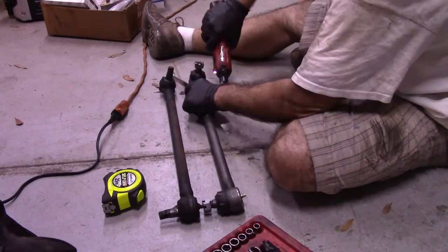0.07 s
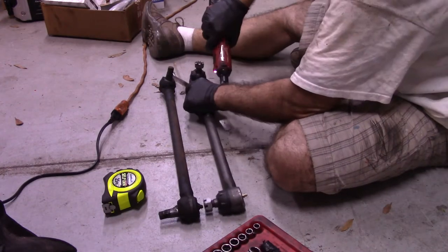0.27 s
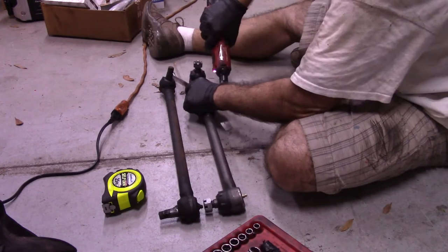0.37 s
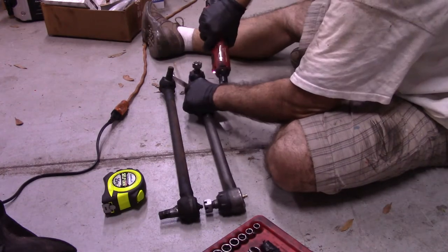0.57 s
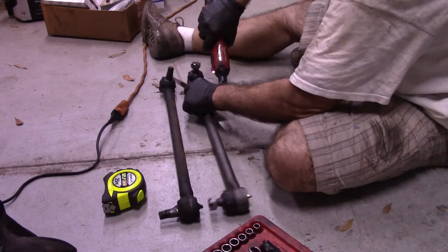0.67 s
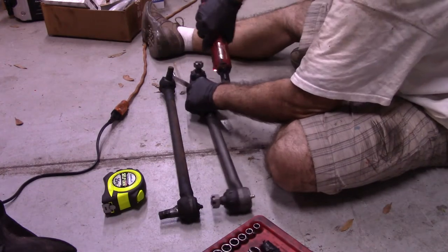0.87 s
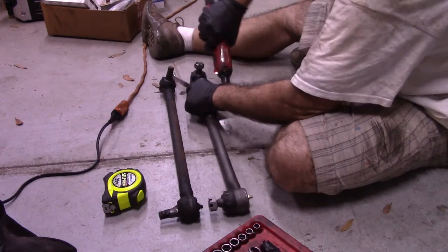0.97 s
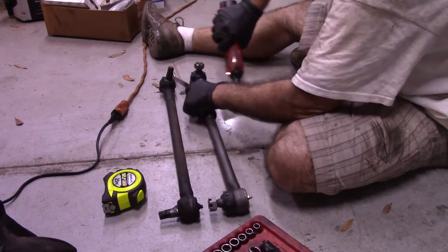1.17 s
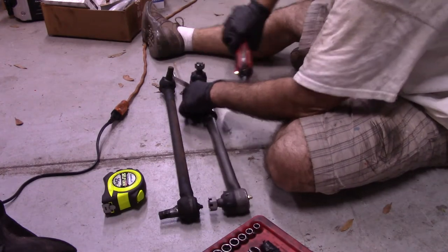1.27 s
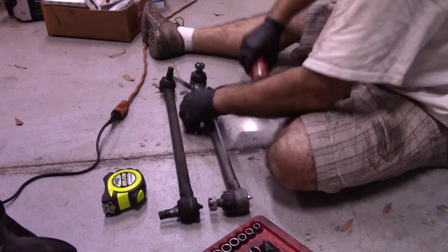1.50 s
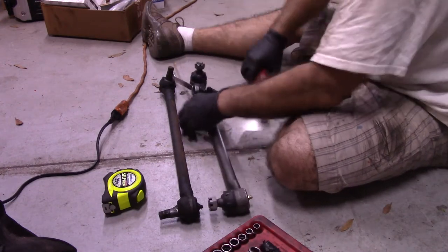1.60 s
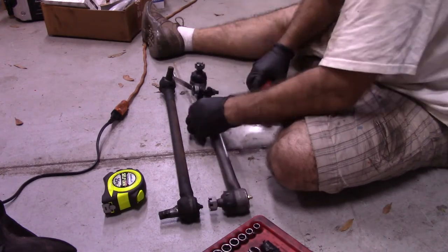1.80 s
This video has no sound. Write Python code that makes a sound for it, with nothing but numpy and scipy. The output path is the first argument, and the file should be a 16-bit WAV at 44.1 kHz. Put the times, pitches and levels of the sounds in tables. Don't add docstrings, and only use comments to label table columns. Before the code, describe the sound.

A cordless ratchet clicks on, rattles hard for one burst, then coasts down in slowing ticks

```python
import sys
import numpy as np
from scipy import signal
from scipy.fft import rfft, irfft, next_fast_len
from scipy.io import wavfile
from scipy.ndimage import map_coordinates

SR = 44100
rng = np.random.default_rng(int(sys.argv[2]) if len(sys.argv) > 2 else 0)


def boost(x):
    u = np.asarray(x, float) / 20
    return 10 ** u


def bounce(signal):
    frames = np.transpose(np.atleast_2d(signal))
    limited = np.clip(frames, -1, 1)
    pcm = np.round(limited * 32767).astype(np.int16)
    wavfile.write(sys.argv[1], SR, pcm)


N = 81585

# (frequency [Hz], density [dB/Hz])
AIR_SPECTRUM = [(25, -20), (60, -11), (190, -7), (480, -11), (940, -13), (1500, -24), (4000, -32),
                (9000, -41.5), (15500, -64)]
# (frequency [Hz], width [Hz], level [dB])
FAN_LINES = [(152, 8, -52), (910, 6, -55.5), (356, 20, -66)]

# (time [s], level [dB], brightness [dB])
KNOCKS = [(.045, -55, 2), (0.134, -43.5, -14.5), (.199, -37.5, 11), (0.203, -36, -6), (0.216, -30.5, 7),
          (0.242, -19, -9), (0.263, -25, 1), (0.814, -10, -3), (0.864, -14.5, -4), (0.909, -39, 1),
          (0.92, -22, -18), (0.924, -10.5, -3.5), (0.95, -41, 19), (1.702, -31.5, -4.5), (1.744, -44, 2),
          (1.315, -30.5, 8), (0.205, -33, 4), (0.788, -15.5, -15), (0.724, -16.5, -20.5)]
# (frequency [Hz], density [dB])
KNOCK_BODY = [(200, -9), (600, 3.5), (1600, -4), (3500, -12.5), (6000, -28.5)]
# (frequency [Hz], density [dB])
KNOCK_EDGE = [(2500, -7.5), (4000, -2), (5500, -9.5), (8000, -6.5), (11000, -20), (16000, -40)]
# (frequency [Hz], width [Hz], gain [dB])
HOUSING = [(880, 130, 1.5), (1524, 280, 5), (2975, 780, 5), (3810, 1040, 6), (6270, 1370, 6),
           (9740, 2900, 4.5)]
# (time [s], frequency [Hz], level [dB], T60 [s])
PINGS = [
    (.179, 5600, -50, .3),
    (1.315, 7090, -22.5, .33),
    (.281, 1570, -25, .6),
    (1.763, 7950, -66, .15),
    (1.312, 3000, -38, .1),
    (.2445, 500, -14, .018),
    (.2445, 800, -17, .018),
    (1.601, 3300, -45, .15),
    (.181, 3730, -58, .2),
    (1.702, 720, -40, .04),
]
PING_STOP_S = [.016, .05, .06, .05, .02, .02, .02, .05, .016, .02]

# (time [s], level [dB])
RUSH_DB = [(.238, -110), (.25, -31.5), (.3, -23.5), (.7, -20.5), (.8, -27.5), (.85, -21.5), (.95, -20.5),
           (1.05, -26.5), (1.15, -32), (1.3, -39.5), (1.45, -44.5), (1.62, -54), (1.78, -66.5)]
# (frequency [Hz], density [dB/Hz])
RUSH_SPECTRUM = [(71, -59.5), (120, -56), (144, -10), (188, -14.5), (839, 1.5), (1210, -7), (1620, -2),
                 (12500, -7.5), (16000, -14.5)]
# (time [s], level [dB])
RUB_DB = [(.24, -100), (.25, -50), (1.3, -52), (1.55, -68), (1.7, -63), (1.76, -88)]
# (frequency [Hz], density [dB])
PAWL_SPECTRUM = [(3000, -65), (6000, -5), (9000, -9.5), (10500, -7.5), (11600, -4), (12800, 5.5),
                 (14200, -9), (16000, -35.5)]
# (time [s], frequency [Hz], level [dB])
WHINE = [(.95, 3500, -46), (1.04, 3100, -35), (1.15, 2400, -42), (1.21, 2050, -44), (1.28, 1700, -46),
         (1.36, 1420, -50), (1.45, 1100, -65)]
# (multiple of mesh frequency [1], level [dB])
WHINE_ORDERS = [(1, 0), (.25, -3), (.58, -5)]

# (time [s], level [dB])
JUDDER_DB = [(.24, -32), (.33, -49), (.45, -44.5), (.55, -34.5), (.7, -35.5), (.81, -28), (.84, -37.5),
             (.98, -38), (1.14, -78)]
# (frequency [Hz], density [dB])
JUDDER_SPECTRUM = [(80, -46), (140, -5.5), (300, -3.5), (700, -2), (1500, -52)]

# (time [s], peak [dB], ring [Hz], grind re peak [dB])
BLOWS = [(0.2463, -20, 2750, -19), (0.2617, -5, 4160, -9.5), (0.2794, -10, 2700, -7),
         (0.2986, -11, 3600, -2), (0.3138, -5, 3100, -7), (0.3301, -8, 3900, -5), (0.3452, -9, 3160, -8),
         (0.36, -10, 3650, -9), (0.3758, -5, 3550, -11), (0.3914, -7, 3060, -9), (0.4079, -6, 2750, -12),
         (0.4225, -3, 3040, -16), (0.4386, -5.5, 3320, -17), (0.4534, -6.5, 3450, -15),
         (0.4684, -7, 3930, -19), (0.4846, -6.5, 3660, -7.5), (0.4999, -4.5, 3200, -10),
         (0.5165, -6, 3340, -8.5), (0.5336, -6, 2780, -7.5), (0.55, -2, 3070, -11), (0.5657, -8, 2540, -9),
         (0.5715, -7, 3950, -14), (0.5847, -8, 2720, -8), (0.6014, -4, 2870, -7.5),
         (0.6212, -7, 3440, -8.5), (0.6263, -7.5, 3070, -8.5), (0.643, -6.5, 3800, -1),
         (0.6661, -4, 2960, -14), (0.6868, -2.5, 3890, -9), (0.7002, -8, 2980, -4.5),
         (0.7213, -5.5, 3880, -4.5), (0.7412, -5.5, 3070, -3.5), (0.7486, -7.5, 2520, -9.5),
         (0.7655, -5.5, 4650, -8), (0.769, -7, 2880, -6.5), (0.788, -9, 3740, -11),
         (0.795, -4.5, 3840, -10), (0.813, -5, 3980, -4.5), (0.8268, -9, 3600, -2), (0.8641, -8, 3750, -13),
         (0.8834, -12, 3510, -4), (0.9092, -6.5, 3860, -11), (0.9508, -15, 4080, -9),
         (0.968, -8, 3530, -18), (0.9814, -21, 3300, -17), (1.0125, -16.5, 3580, -13),
         (1.0282, -19, 3100, -25), (1.0471, -17, 2940, -31), (1.082, -14, 3560, -16),
         (1.1148, -17.5, 3700, -15)]
# (frequency [Hz], density [dB/Hz])
GRIND_SPECTRUM = [(71, -59), (120, -8), (181, -21), (643, -3.5), (2200, -5), (2990, -9.5), (5190, -13),
                  (13000, -23), (16000, -49)]
# (frequency [Hz], width [Hz], level [dB])
YOKE_MODES = [(1400, 400, 0.5), (2980, 810, 1.5), (3740, 1700, -0.5), (6300, 2200, -7), (9220, 1240, 8.5)]
# (frequency [Hz], density [dB])
CRACK_SPECTRUM = [(2000, -30), (4000, -34), (7000, 23), (9500, 18.5), (12000, 8), (15000, -4)]

# (time [s], position [turns])
CRANK_TURNS = [(.2555, 0), (.2755, 1), (.293, 2), (.325, 4), (.464, 13), (.528, 17), (.597, 21), (.655, 24),
               (.738, 28), (.806, 31), (.844, 33), (.875, 35), (.977, 42), (1.024, 45), (1.077, 48),
               (1.136, 51)]
# (time [s], peak [dB], dull part [dB])
COAST_TICKS = [(1.0472, -8.5, -32), (1.1568, -18, -24), (1.1592, -15, -28), (1.1804, -16, -21),
               (1.185, -14.5, -26), (1.204, -21, -20), (1.209, -16, -18), (1.2317, -17, -13),
               (1.2373, -19, -5), (1.261, -21, -5), (1.265, -15, -2.5), (1.293, -14, -13), (1.297, -19, -9),
               (1.3271, -13, -11), (1.334, -17.5, -3), (1.367, -13.5, -10), (1.375, -20, -10),
               (1.4143, -11, -14), (1.4228, -16.5, -16), (1.4731, -14, -11), (1.4859, -17, -4.5),
               (1.57, -19, -2), (1.6007, -19, -1), (1.701, -42, 12)]
# (frequency [Hz], width [Hz], level [dB])
TOOTH_MODES = [(7000, 2300, 0.5), (10500, 620, -2.5), (12570, 340, -1.5), (13130, 520, 0),
               (15400, 1500, -10)]
# (frequency [Hz], density [dB])
DULL_SPECTRUM = [(300, 6), (900, 9), (2200, -5), (3500, 10.5), (5000, -7), (8000, -5)]

# (frequency [Hz], T60 [s])
WALL_T60_S = [(200, 0.088), (2000, 0.45), (8000, 0.19), (14000, 0.22)]
# (frequency [Hz], gain [dB])
SIDE_DB = [(30, -36), (250, -16), (600, -21), (1200, -23), (2500, -16.5), (4500, -10.5), (12000, -9)]


def unit(x):
    return x / np.sqrt(np.mean(x ** 2) + 1e-20)


def along(points, hz):
    f, v = np.transpose(points)
    return np.interp(np.log(hz + 1), np.log(f + 1), v)


def curves(rows):
    s, *cols = np.transpose(rows)
    return [np.interp(np.arange(N) / SR, s, c) for c in cols]


def filtered(x, response):
    m = next_fast_len(N + SR // 2)
    return irfft(rfft(x, m) * response(np.fft.rfftfreq(m, 1 / SR)), m)[..., :N]


def noise(spectrum, peaks=()):
    def response(f):
        bumps_db = sum(db / (1 + ((f - c) / (w / 2)) ** 2) for c, w, db in peaks)
        return boost(along(spectrum, f) + bumps_db)
    return unit(filtered(rng.standard_normal(N), response))


def wander(knots):
    return map_coordinates(rng.standard_normal(knots), [np.linspace(0, knots - 1, N)])


def decay(t, t60_s, rise_s):
    return boost(-60 * t / t60_s) * (1 - np.exp(-t / rise_s))


def bursts(times, dbs, t60_s, rise_s=0.00019):
    spikes, t = np.zeros(N), np.arange(SR // 8) / SR
    np.add.at(spikes, np.round(np.asarray(times) * SR).astype(int), boost(dbs))
    return signal.fftconvolve(spikes, decay(t, t60_s, rise_s))[:N]


def struck(times, dbs, modes):
    spikes, luck = np.zeros(N), rng.standard_normal((len(times), 6))
    for j in range(3):
        at = (times + 0.0003 * j * np.abs(luck[:, j])) * SR
        np.add.at(spikes, at.astype(int), boost(dbs - 6 * j) * np.sign(luck[:, 3 + j]))

    def response(f):
        total = 0
        for k, (c, w, db) in enumerate(modes):
            gain = (-1) ** k * boost(db) * SR / (2 * np.pi)
            total = total + gain * 1j * f / (c * c - f * f + 1j * f * w)
        return total
    return filtered(spikes, response)


def air():
    t, hum = np.arange(N) / SR, np.zeros(N)
    for hz, width_hz, db in FAN_LINES:
        resonance = lambda f: 1 / (1 + ((f - hz) / width_hz) ** 2)
        waver = unit(filtered(rng.standard_normal(N), resonance))
        hum += boost(db) * (np.sin(2 * np.pi * hz * t) + 0.29 * waver)
    return boost(-48) * noise(AIR_SPECTRUM) + hum


def knocks():
    t60_s = 0.034
    s, db, bright_db = np.transpose(KNOCKS)
    body = bursts(s, db - bright_db / 2, t60_s, 0.0029) * noise(KNOCK_BODY, HOUSING)
    edge = bursts(s, db + bright_db / 2 + 4.5, t60_s / 3) * noise(KNOCK_EDGE)
    return body + edge


def pings():
    rise_s, damped_db, damping_s = 0.003, -8, 0.0027
    out = np.zeros(N)
    for (s, hz, db, t60_s), stop_s in zip(PINGS, PING_STOP_S):
        t = np.clip(np.arange(N) / SR - s, 0, None)
        damp_db = damped_db * np.clip((t - stop_s) / damping_s, 0, 1)
        out += boost(db + damp_db) * decay(t, t60_s, rise_s) * np.sin(2 * np.pi * hz * t)
    return out


def gears():
    grit_db = 3.43 * np.tanh(wander(700))
    rush = boost(curves(RUSH_DB)[0] + grit_db) * noise(RUSH_SPECTRUM, HOUSING)
    rub = boost(curves(RUB_DB)[0] + grit_db) * noise(PAWL_SPECTRUM, [(13100, 320, 14)])

    mesh_hz, db = curves(WHINE)
    phase = 2 * np.pi * np.cumsum(mesh_hz) / SR
    lines = sum(boost(d) * np.sin(m * phase) for m, d in WHINE_ORDERS)
    i = np.arange(N)
    sounding = (i > WHINE[0][0] * SR) * (i < WHINE[-1][0] * SR)
    whine = sounding * boost(db + 1.4 * wander(120)) * lines
    return rush + rub + whine


def bolt_judder():
    loaded = np.abs(np.arange(N) / SR - 0.69) < 0.45
    return boost(curves(JUDDER_DB)[0]) * loaded * noise(JUDDER_SPECTRUM)


def yoke_blows():
    ring_t60_s, ring_db, ring_rise_s = 0.009, -2, 0.00047
    times, db, hz, grind_db = np.transpose(BLOWS)
    times = times + 0.0008
    ring, t = np.zeros(N), np.arange(SR // 40) / SR
    for at, level_db, f in zip(times, db, hz):
        tone = boost(level_db + ring_db) * decay(t, ring_t60_s, ring_rise_s) * np.sin(2 * np.pi * f * t)
        ring[round(at * SR):][:len(t)] += tone
    grind = bursts(times, db + grind_db, 0.04, 0.002) * noise(GRIND_SPECTRUM, HOUSING)
    crack = bursts(times, db - 8, 0.006, 0.00014) * noise(CRACK_SPECTRUM)
    return ring + grind + struck(times, db - 10.5, YOKE_MODES) + crack


def pawl_ticks():
    scatter_s, scatter_db = 0.0007, 2.5
    s, turns = np.transpose(CRANK_TURNS)
    k, luck = np.arange(52), rng.standard_normal((52, 2))
    times = np.interp(k - 0.06, turns, s) + scatter_s * luck[:, 0]
    db = -10.5 - 3 * ((k > 17) & (k < 29)) + scatter_db * luck[:, 1]
    return bursts(times, db, 0.0077, 0.0011) * noise(PAWL_SPECTRUM, [(12700, 4100, 7.1)])


def coasting():
    s, db, dull_db = np.transpose(COAST_TICKS)
    tooth = struck(s, db - 4.5, TOOTH_MODES)
    hiss = bursts(s, db - 8, 0.015) * noise(PAWL_SPECTRUM)
    dull = bursts(s, db + dull_db - 15, 0.044) * noise(DULL_SPECTRUM)
    return tooth + hiss + dull


def garage(x):
    hz, t, z = signal.stft(rng.standard_normal(SR // 2), SR, nperseg=256)
    fade = boost(-60 * t / along(WALL_T60_S, hz)[:, None])
    tail = signal.istft(z * fade, SR, nperseg=256)[1]
    delayed = np.pad(x, (200, 0))
    return signal.fftconvolve(delayed, tail / np.linalg.norm(tail))[:N]


def scene():
    low_cut = lambda f: 1 / (1 + (130 / (f + 1)) ** 4)
    tool = knocks() + pings() + gears() + bolt_judder() + yoke_blows() + pawl_ticks() + coasting()
    tool = filtered(tool, low_cut)
    mid = tool + boost(-11) * garage(tool) + air()
    side = 0.23 * np.roll(tool, 40) + 0.084 * garage(tool) + air()
    side = filtered(side, lambda f: boost(along(SIDE_DB, f)))
    return np.array([mid + side, mid - side])


def band_limit(x):
    return signal.sosfilt(signal.butter(12, 16790, fs=SR, output="sos"), x)


def record(dry):
    clip_at, clip_hardness = 0.6, 12
    top_hz, soft_top_hz, soft_top_db = 16790, 15750, -42
    held = dry / (1 + np.abs(dry / clip_at) ** clip_hardness) ** (1 / clip_hardness)

    def band(hz):
        shelf = boost(soft_top_db * np.clip((hz - soft_top_hz) / 250, 0, 1))
        return (hz < top_hz) * shelf / (1 + (35 / (hz + 1)) ** 4)
    return band_limit(filtered(held, band))


dry = scene()
out = record(dry)
bounce(out)
```